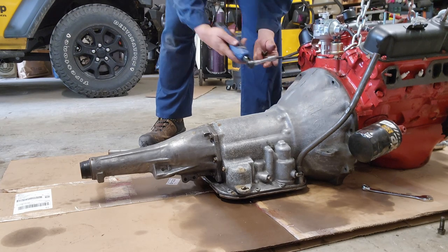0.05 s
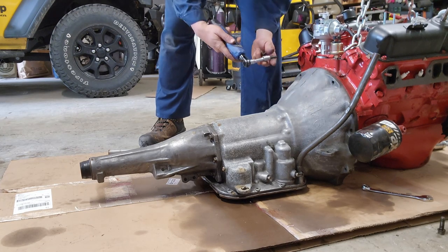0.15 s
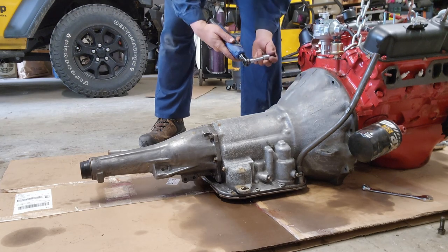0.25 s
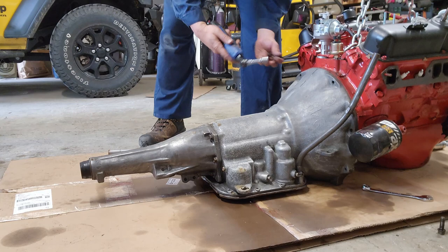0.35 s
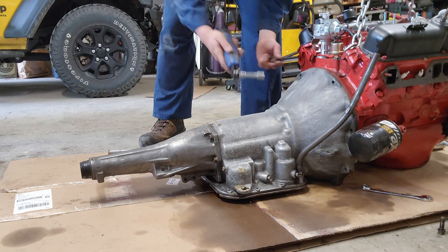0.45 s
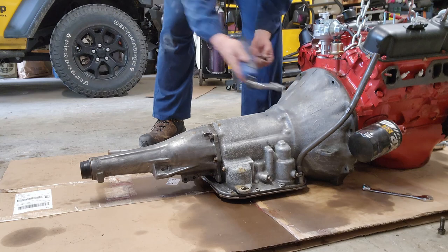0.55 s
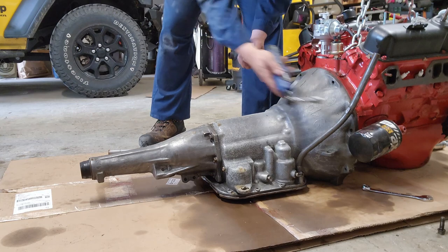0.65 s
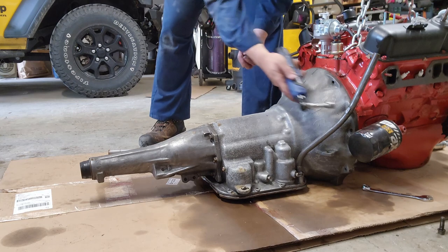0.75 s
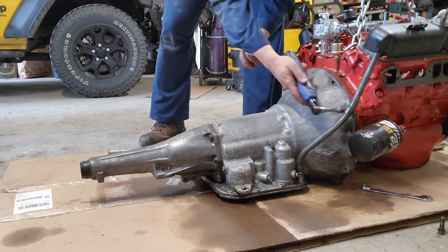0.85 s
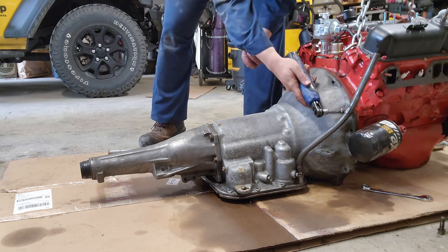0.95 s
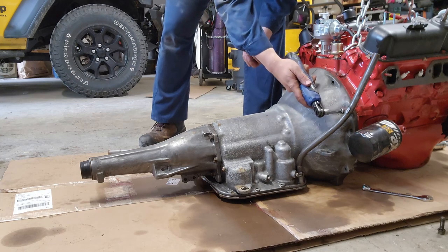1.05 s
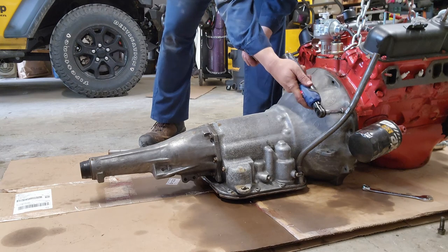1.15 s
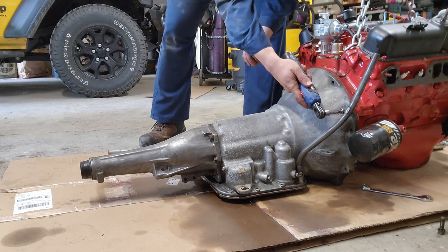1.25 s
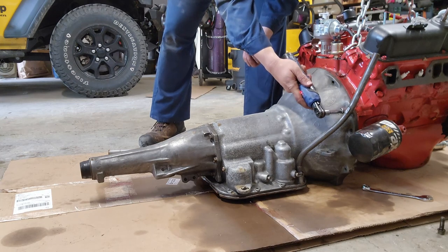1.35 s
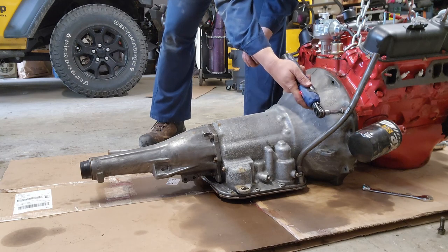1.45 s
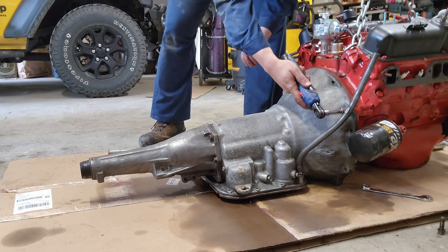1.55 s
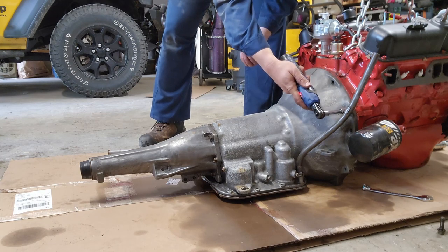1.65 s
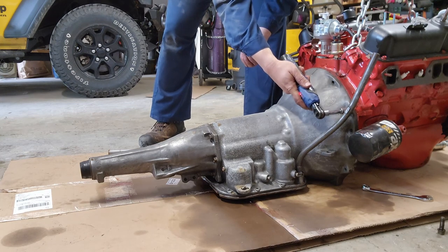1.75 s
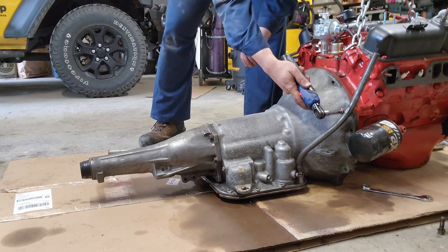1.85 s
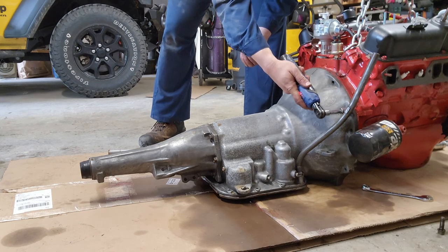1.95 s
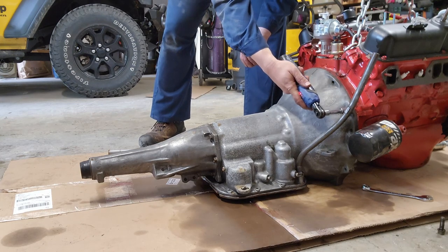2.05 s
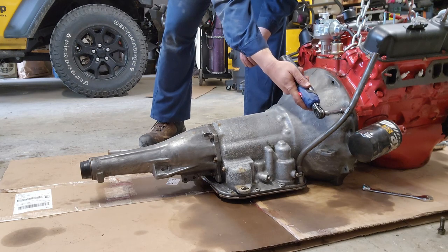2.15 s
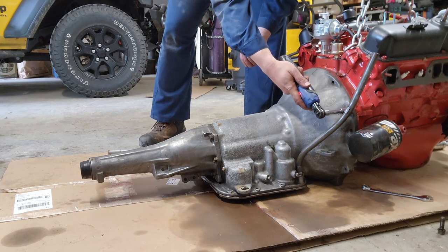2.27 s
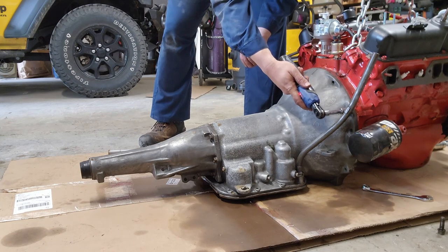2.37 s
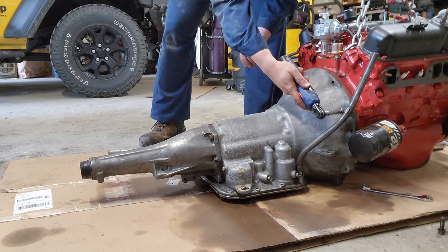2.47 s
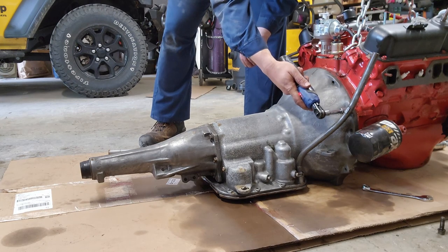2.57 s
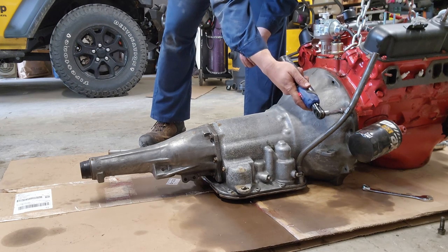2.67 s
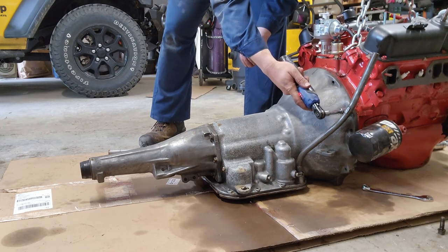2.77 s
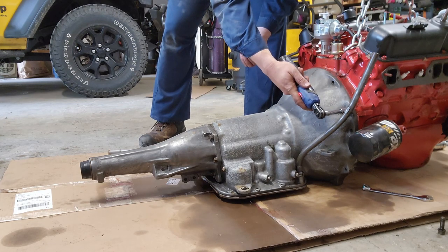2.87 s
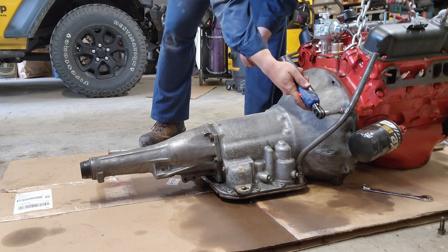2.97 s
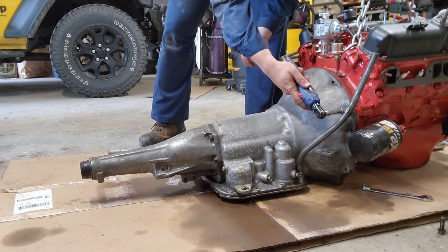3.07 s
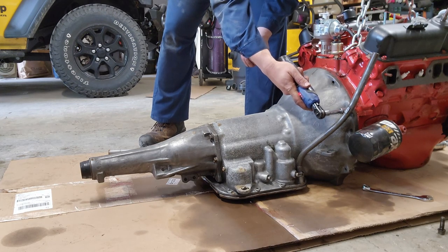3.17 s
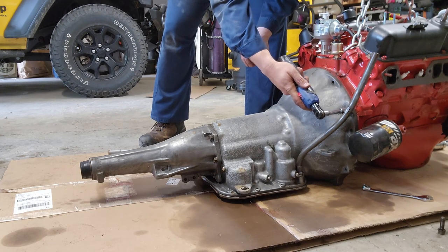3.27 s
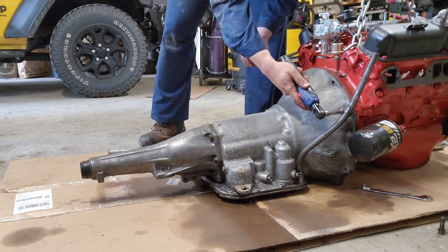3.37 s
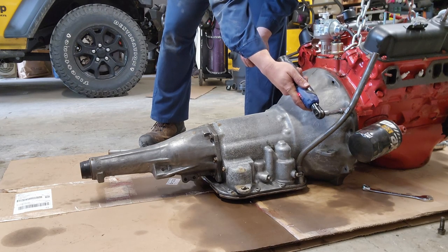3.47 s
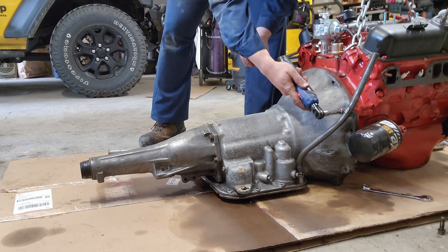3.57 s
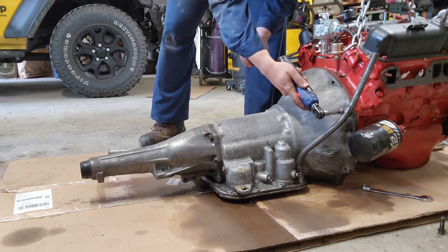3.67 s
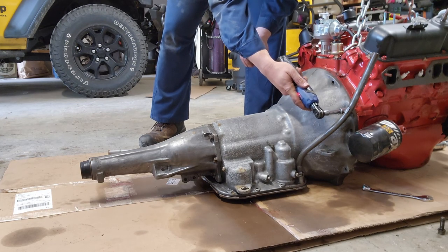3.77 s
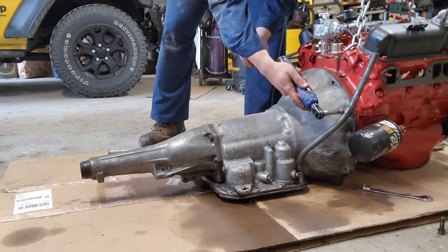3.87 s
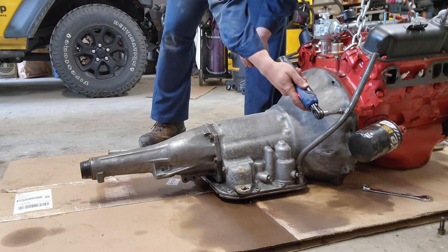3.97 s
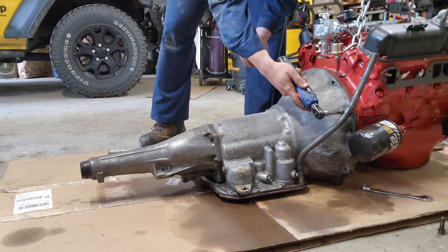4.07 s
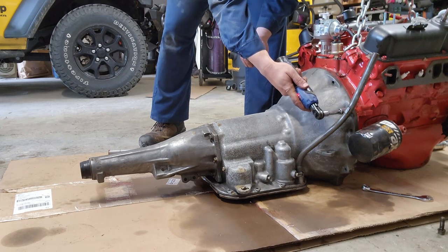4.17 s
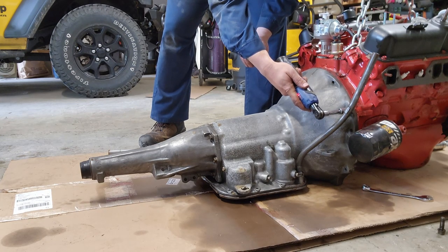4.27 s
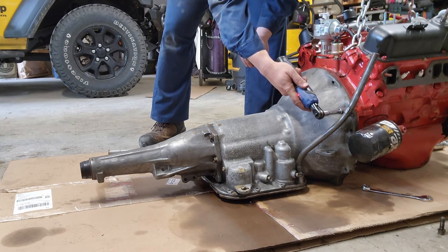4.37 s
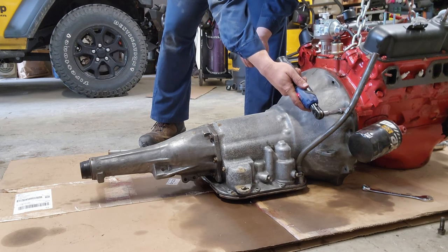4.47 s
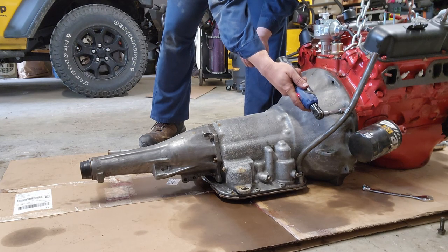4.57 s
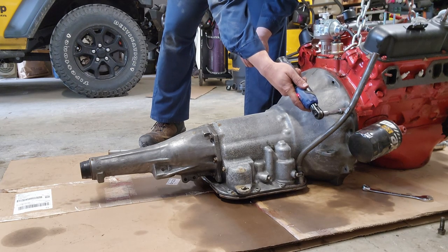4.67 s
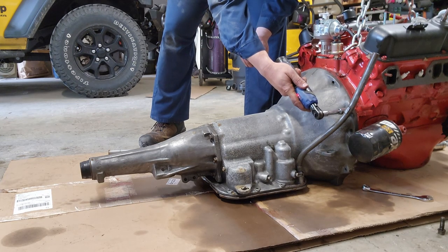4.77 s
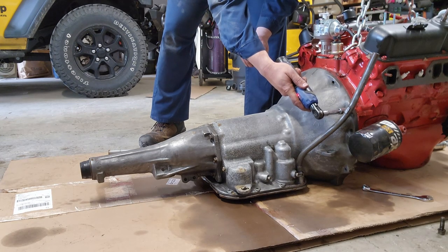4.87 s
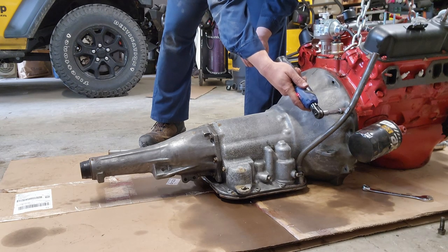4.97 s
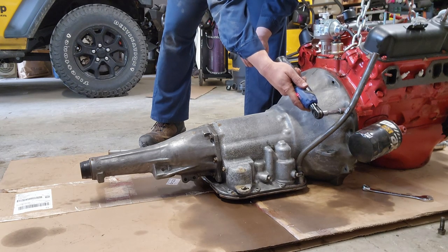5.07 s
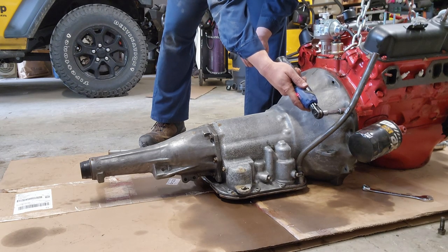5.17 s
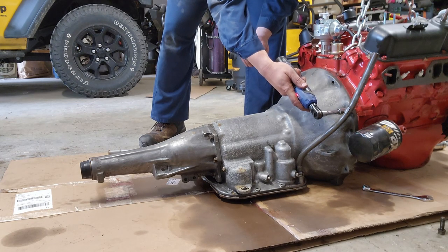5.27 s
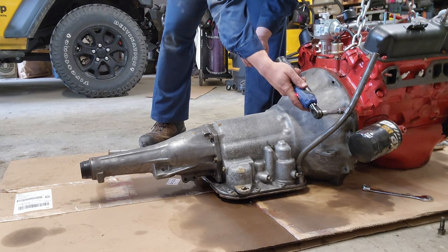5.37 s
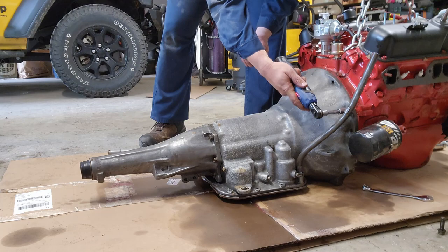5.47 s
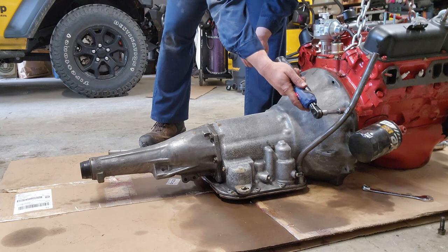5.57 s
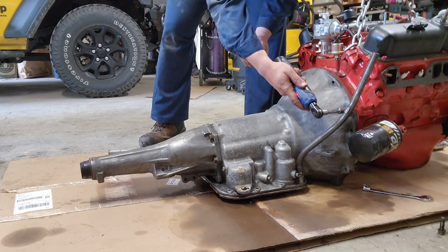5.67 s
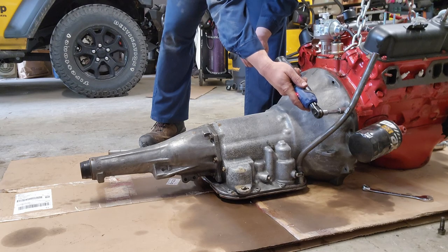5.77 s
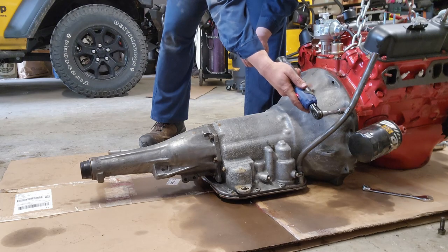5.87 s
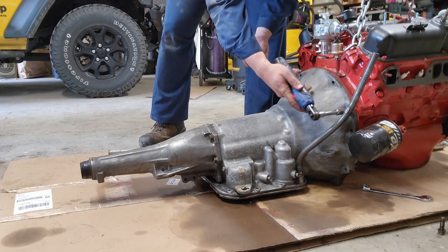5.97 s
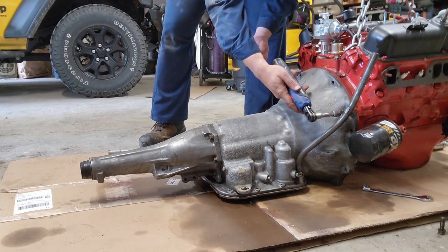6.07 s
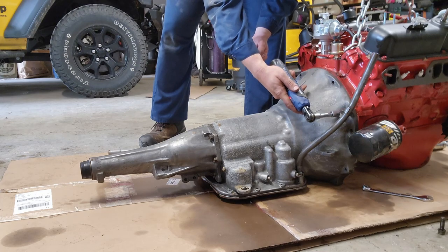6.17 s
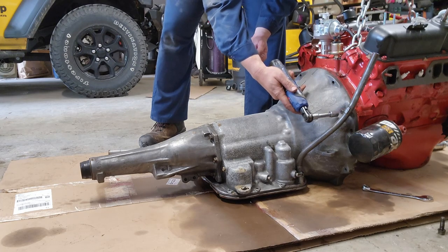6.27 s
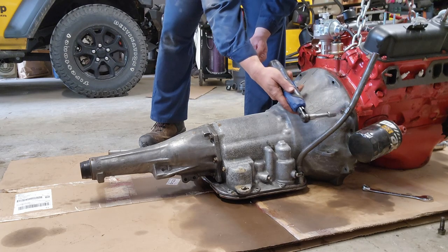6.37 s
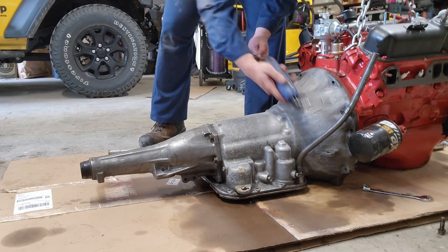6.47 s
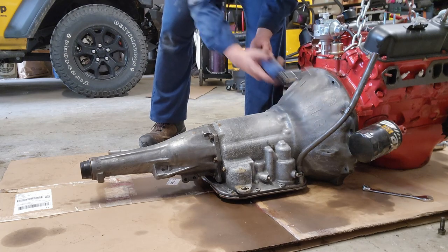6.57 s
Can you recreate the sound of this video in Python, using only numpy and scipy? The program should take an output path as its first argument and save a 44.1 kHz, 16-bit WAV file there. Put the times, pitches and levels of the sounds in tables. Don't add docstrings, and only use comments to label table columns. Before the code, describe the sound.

Quiet garage air with a few light metal touches and tiny distant insect chirps. A hard clank of socket on casting comes near one second, then the power ratchet starts: a fast, bright, grating clatter over a buzzing hum, held about four and a half seconds with irregular sharper snaps. Released, it slows into distinct ticks. Close stereo microphones, lively room tail.

```python
import sys
import numpy as np
from scipy import signal
from scipy.io import wavfile
from scipy.ndimage import uniform_filter1d

SR = 44100
rng = np.random.default_rng(int(sys.argv[2]) if len(sys.argv) > 2 else 0)


def persist_wave(psi):
    counts = np.round(np.clip(psi, -1, 1) * 32767).astype(np.int16)
    wavfile.write(sys.argv[1], SR, np.atleast_2d(counts).T)


def volts_from_decibels(level):
    exponent = np.asarray(level, float) / 20
    return 10 ** exponent


N = 291942
T = np.arange(N) / SR

# (frequency [Hz], likeness [0-1])
FACING = [(200, 0.69), (1000, 0.98), (3000, 0.35), (12000, 0.44)]

TRIGGER_S, FIRST_TURN_S, RUN_PER_S, SPIN_UP_LAG_S, SPIN_UP_S = 1.2272, 1.262, 64.88, .0218, .098
RELEASE_S, DRAG_S, FRICTION_PER_S = 5.7927, 1.378, 68.8
LAST_DRIVEN, WHEEL_TURNS = 302, 38.5
POWERED_S = np.clip(T, TRIGGER_S, RELEASE_S) - FIRST_TURN_S
COASTING_S = np.maximum(T - RELEASE_S, 0)
SPUN_UP = RUN_PER_S * (POWERED_S - SPIN_UP_LAG_S * (1 - np.exp(-POWERED_S / SPIN_UP_S)))
DRAGGED = (RUN_PER_S + FRICTION_PER_S) * DRAG_S * (1 - np.exp(-COASTING_S / DRAG_S))
TURNS = 1 + SPUN_UP + DRAGGED - FRICTION_PER_S * COASTING_S
SPEED = np.maximum(np.gradient(TURNS) * SR / RUN_PER_S, 0)


def evened(x):
    return x / np.sqrt(np.mean(x ** 2) + 1e-20)


def read(points, hz):
    f, value = np.transpose(points)
    return np.interp(np.log(hz + 1), np.log(f + 1), value)


def highpass(x, order, hz):
    return signal.sosfilt(signal.butter(order, hz, "high", fs=SR, output="sos"), x)


def alike(a, b, same):
    return np.array([a, same * a + np.sqrt(1 - same ** 2) * b])


def contact(train, seconds):
    return signal.lfilter([1], [1, -np.exp(-1 / (seconds * SR))], train)


def strike(force, modes):
    out, power = np.zeros((2, len(force))), 0
    grit = rng.standard_normal(2 * len(force))
    for hz, db, t60_s in modes:
        r = 10 ** (-3 / (t60_s * SR))
        turn = 2 * np.pi * hz / SR
        a, b = np.roll(grit, rng.integers(len(grit))).reshape(2, -1)
        rough = force * alike(a, b, np.clip(read(FACING, hz), 0, 1))
        ring = signal.lfilter([1], [1, -2 * r * np.cos(turn), r * r], rough)
        out += volts_from_decibels(db) * np.sin(turn) * ring
        power += volts_from_decibels(db) ** 2 / (2 - 2 * r * r)
    return out / np.sqrt(power)


def clicks(per_s, uneven_db):
    size = volts_from_decibels(uneven_db * np.minimum(rng.exponential(1, N), 5))
    return size * (rng.random(N) < per_s / SR)


def diffuse(frames, size, likeness=None):
    # (frequency [Hz], likeness [-1 to 1])
    room_likeness = [(60, 0.97), (240, 1), (950, 0.095), (3770, 0), (15000, -0.0)]
    hz = np.fft.rfftfreq(size, 1 / SR)
    a, b, c, d = rng.standard_normal((frames, len(hz), 4)).T
    same = np.clip(read(likeness or room_likeness, hz), -1, 1)[:, None]
    return hz[:, None], alike(a + 1j * b, c + 1j * d, same)


def drift(shape, bins, frames):
    return evened(uniform_filter1d(uniform_filter1d(rng.standard_normal(shape), bins, 0), frames, 1))


def per_turn(at, jitter_s, uneven_db, bounce_s):
    when_s = np.interp(np.arange(1, LAST_DRIVEN + 1) + at, TURNS, T)
    late, force, gap, again = rng.standard_normal((len(when_s), 4)).T
    when_s = when_s + jitter_s * late
    bounced_s = when_s + bounce_s * (1 + .4 * abs(gap))
    size = volts_from_decibels(uneven_db * force)
    train = np.zeros(N)
    np.add.at(train, (when_s * SR).astype(int), size)
    np.add.at(train, (bounced_s * SR).astype(int), size * volts_from_decibels(-7 + 4 * again))
    return train


def step(s, rise_s):
    return .5 + .5 * np.tanh((T - s) / rise_s)


def load(db, swing, last=LAST_DRIVEN):
    swing_db = sum(depth_db * np.cos(2 * np.pi * (k * TURNS / WHEEL_TURNS - lag)) for k, depth_db, lag in swing)
    take_up_db = -2.5 * np.exp(-abs(T - TRIGGER_S) / 0.18)
    return volts_from_decibels(db + swing_db + take_up_db) * (T > TRIGGER_S + .02) * (TURNS < last + 1)


def earlier(db):
    return volts_from_decibels(db - 255 * T)


def hall():
    # (frequency [Hz], density [dB per Hz])
    hall_colour = [(59, -41), (100, -13), (129, -10.5), (153, -24), (219, -16), (461, -13), (595, -5.5),
                   (662, -10), (836, -20.5), (2040, -13.5), (2900, -31), (3700, -24.5), (4770, -17.5),
                   (10200, -37), (16000, -59)]
    # (frequency [Hz], density [dB per Hz])
    draught_colour = [(8.8, -38), (15, -17), (65, 9), (79, 10), (97, -22), (110, -18), (140, -52),
                      (240, -120)]
    # (time [s], level [dB])
    gust_levels = [(0.0, -79), (0.35, -73.5), (2.57, -75), (2.66, -70), (2.9, -93), (2.96, -80),
                   (3.42, -84), (3.47, -65), (3.82, -98), (3.93, -74), (5.09, -74.5), (5.13, -99),
                   (5.18, -76), (5.39, -72), (5.44, -84), (5.99, -71), (6.21, -79), (6.6, -81)]
    hall_db, draught_db = -66.5, 1
    frames = N // 512 + 5
    hz, z = diffuse(frames, size=2048)
    patches = drift(z.shape[1:], 14, 7)
    lumps = evened(uniform_filter1d(rng.standard_normal(frames), 7))
    gusts = diffuse(frames, size=2048, likeness=[(20, 0.65), (100, 0.94)])[1]

    def sounded(spectra):
        return evened(signal.istft(spectra, nperseg=2048, noverlap=1536)[1][:, :N])

    air = sounded(z * volts_from_decibels(read(hall_colour, hz) + 1.5 * patches))
    low = sounded(gusts * volts_from_decibels(read(draught_colour, hz) + 5 * lumps))
    gust_db = np.interp(T, *np.transpose(gust_levels)) + np.array([[1.1], [-1.1]])
    return volts_from_decibels(hall_db) * air + volts_from_decibels(draught_db + gust_db) * low


def insects():
    # (time [s], frequency [Hz], level [dB], length [s])
    chirps = [
        (0.344, 4780, -62, 0.017),
        (0.382, 5000, -58, 0.031),
        (0.43, 3650, -72, 0.045),
        (0.76, 3700, -70, 0.064),
        (.846, 4700, -66, 0.018),
        (0.882, 4960, -57, 0.026),
    ]
    out = np.zeros(N)
    for s, hz, db, length_s in chirps:
        t = np.arange(round(length_s * SR)) / SR
        throb = 1 + 0.83 * np.cos(2 * np.pi * 70 * t)
        whistle = volts_from_decibels(db) * np.sin(2 * np.pi * hz * t) * throb
        out[round(s * SR):][:len(t)] += whistle * signal.windows.tukey(len(t), .5)
    return out


def garage(x):
    # (frequency [Hz], t60 [s])
    decay = [(200, 0.087), (1000, 0.71), (3500, 0.43), (8000, 0.31), (15000, 0.2)]
    out = 0
    for k in range(3):
        hz, z = diffuse(500, size=256)
        t = np.arange(500) * 64 / SR
        fade = volts_from_decibels(-60 * t / read(decay, hz)) * np.clip(t / 0.0065, 0, 1)
        tail = signal.istft(z * fade, nperseg=256, noverlap=192)[1]
        tail = tail / np.linalg.norm(tail[0])
        turn = np.sqrt(2 / 3) * np.cos(2 * np.pi * (1.3 * T + k / 3))
        out = out + signal.fftconvolve((x * turn)[None], tail, axes=1)[:, :N]
    return out


def socket():
    # (time [s], peak level [dB], centre [Hz], width [octaves], contact [s])
    clanks = [(.02, -47, 950, 0.34, 0.034), (.035, -52, 9500, 0.96, .004), (0.196, -34, 9400, 0.32, 0.0041),
              (.262, -54, 11000, .6, .003), (.377, -54, 8500, .45, .003), (0.398, -49.5, 850, 1.5, 0.0052),
              (.971, -17, 3970, 1.34, 0.011), (.972, -29, 1560, .2, .008), (.991, -26, 2420, 0.72, 0.007),
              (1.021, -43, 3600, .8, 0.0025), (1.158, -32.5, 7000, 0.58, 0.0071),
              (1.213, -36, 1300, 1.3, 0.028), (1.2272, -35.5, 7450, .25, .006),
              (1.245, -21, 1320, 0.89, 0.09)]
    # (frequency [Hz], level [dB], t60 [s])
    casting = [(850, 1.5, 0.0097), (1000, -1, 0.0055), (1560, 2, 0.0073), (2280, 8, 0.002),
               (3100, -2, 0.0097), (3400, 9, 0.011), (3770, 7, 0.0072), (4340, 5, 0.0051),
               (5000, 5, 0.0086), (5750, 6.5, 0.0046), (6740, 9, 0.0026), (7470, 1, 0.004),
               (9000, 11, 0.0027), (11000, 8, 0.002), (13200, 14, 0.0022), (14500, 9, 0.002)]
    # (time [s], peak level [dB], frequency [Hz])
    jolts = [(.985, -65, 235), (1.164, -56, 229), (1.2, -59, 230), (1.245, -43, 222), (3.748, -59, 342),
             (4.341, -47, 217), (4.934, -57, 194), (5.247, -45, 310), (5.595, -67, 190), (1.41, -40, 122),
             (1.86, -43.5, 123), (5.621, -40.5, 130), (5.719, -46, 126), (5.85, -50, 125)]
    first_knock, last_snap, knock_at = 312, 319, .42
    out = np.zeros((2, N))
    knocks = []
    for s in np.interp(np.arange(first_knock, last_snap + 1) + knock_at, TURNS, T):
        knock_db = -27.5 + 20 * 0.4 * np.log10(np.interp(s, T, SPEED))
        knocks.append((s, knock_db, 1300, 1, 0.0094))
    for s, db, centre_hz, octaves, contact_s in [*clanks, *knocks]:
        modes = [(hz, level_db - 6 * (np.log2(hz / centre_hz) / octaves) ** 2, t60_s)
                 for hz, level_db, t60_s in casting]
        blow = strike(contact(signal.unit_impulse(3000), contact_s), modes)
        part = out[:, round(s * SR):][:, :3000]
        part += (volts_from_decibels(db) * blow / abs(blow).max())[:, :part.shape[1]]
    out = highpass(out, 4, 680)
    t = np.arange(16000) / SR
    for s, db, hz in jolts:
        thud = volts_from_decibels(db - 60 * t / 0.32) * np.sin(2 * np.pi * hz * t)
        out[:, round(s * SR):][:, :16000] += thud * np.clip(t / 0.0067, 0, 1)
    return out


def crank():
    # (multiple of crank rate, level [dB])
    orders = [(2, -10.5), (3, -4), (4, -19), (5, -6.5), (6, -6.5), (7, -5), (8, 3), (9, -13), (10, 4.5),
              (11, 8), (12, 0.5), (13, 4), (14, 2.5), (15, -1), (16, 0.5), (17, -0.5), (18, -23), (20, -2),
              (21, 3.5), (23, 1), (28, -8), (29, -2), (32, 2.5), (36, 1)]
    # (time [s], hum level [dB])
    effort = [(1.3, -44), (2.68, -43), (2.84, -47), (2.9, -41), (3.46, -44.5), (3.49, -38.5), (3.66, -43.5),
              (3.9, -40), (3.99, -49), (4.03, -43.5), (4.53, -39), (4.56, -43.5), (4.97, -39),
              (5.06, -43.5), (5.61, -39.5), (6.06, -48.5)]
    # (multiple, swing [dB], lag [cycles])
    hum_swing = [(1, 0.58, -0.17), (2, 0.91, -0.39)]
    last_hum = 307
    angle = 2 * np.pi * TURNS
    waver = rng.standard_normal((220, len(orders), 2)) @ [.7, .7j] + 0.75
    start = rng.uniform(0, 2 * np.pi, len(orders))
    hum = np.zeros(N)
    for (k, db), w, phase in zip(orders, waver.T, start):
        wavering = np.interp(T, np.linspace(0, T[-1], len(w)), w)
        hum += volts_from_decibels(db) * (wavering * np.exp(1j * (k * angle + phase))).real
    effort_db = 0.5 + np.interp(T, *np.transpose(effort))
    level = uniform_filter1d(load(effort_db, hum_swing, last_hum), size=3000)
    return level * SPEED ** 0.82 * evened(hum)


def gears():
    # (frequency [Hz], density [dB per Hz])
    housing = [(59, -76), (100, -71), (189, -86), (295, -25), (420, -15), (595, -10), (705, -9),
               (1200, -7.5), (2000, -3.5), (2450, -3.5), (2720, -7.5), (3000, -5), (4290, -3), (5900, -7.5),
               (9820, -2), (11900, -3.5), (16000, -4.5)]
    hz, t, z = signal.stft(clicks(4000, 1.9) * rng.standard_normal((2, N)), SR, nperseg=1024)
    z = alike(z[0], z[1], np.clip(read(FACING, hz), 0, 1)[:, None])
    hz = hz[:, None]
    patches = drift(z.shape[1:], 12, 6)
    slowed = np.interp(t, T, (1 - SPEED) * (COASTING_S > 0))
    dull_db = -4 * np.log2(1 + hz / 2500) * slowed
    thin_db = -25 * slowed / (1 + (hz / 380) ** 4)
    colour_db = read(housing, hz) + dull_db + thin_db + 1.18 * patches
    rattle = evened(signal.istft(z * volts_from_decibels(colour_db), SR, nperseg=1024)[1][:, :N])
    start_db = -5 * np.exp(-abs(T - TRIGGER_S) / 0.028)
    running = volts_from_decibels(-23 + start_db) * SPEED ** 1.38
    return rattle * (running + earlier(-41.5))


def yoke():
    # (frequency [Hz], level [dB], t60 [s])
    yoke_modes = [(4370, -10, 0.0078), (5495, -9.5, 0.009), (6453, -7.5, 0.012), (7000, -11, 0.011),
                  (7550, 2, 0.0017)]
    # (multiple, swing [dB], lag [cycles])
    yoke_swing = [(1, 2, 0.34), (2, 0.24, 0.46)]
    knocks = evened(contact(per_turn(.3, 0.0004, 1.9, 0.0012), 0.00049))
    return strike(knocks * load(-36, yoke_swing), yoke_modes)


def pawl():
    # (frequency [Hz], level [dB], t60 [s])
    head = [(11420, -2, .007), (11700, 0, .008), (12020, -2, .007), (10600, -9, .003), (11100, -5, .004),
            (12500, -5, .004), (13100, -7, .003), (13800, -6, .0025), (14600, -7, .0025), (15500, -5, .004),
            (9300, -17, .002), (7300, -18, .003), (4400, -20, .003)]
    # (time [s], peak level [dB])
    hard_snaps = [(1.2997, -15), (1.527, -17), (1.542, -10), (1.59, -17), (1.6212, -4), (1.7289, -10),
                  (1.7425, -6), (1.7748, -6.5), (1.868, -11), (2.1765, -10), (2.2078, -5), (2.2407, -5),
                  (2.2836, -20), (2.3153, -13), (2.3305, -7), (2.3766, -10), (2.561, -23), (2.6124, -13.5),
                  (2.6692, -16), (2.7455, -11), (2.763, -7), (2.7928, -5), (2.8093, -3), (2.825, -3),
                  (2.8866, -11), (2.9002, -11), (3.038, -14), (3.0698, -6), (3.2554, -24), (3.286, -10),
                  (3.332, -12), (3.3951, -14), (3.485, -22), (3.533, -11), (3.8725, -28), (3.9348, -6),
                  (3.965, -12), (4.057, -9), (4.1183, -8), (4.2107, -24), (4.271, -13), (4.4743, -8),
                  (4.551, -7), (4.6577, -13), (4.704, -6), (4.859, -19), (4.8728, -15), (5.0283, -24),
                  (5.091, -20), (5.3192, -23), (5.3973, -21), (5.5207, -8), (5.644, -8), (5.737, -13),
                  (5.8136, -21), (5.845, -12), (5.9006, -23), (5.9375, -14), (5.9606, -26)]
    # (time [s], peak level [dB], rebound [dB])
    coast_snaps = [(5.9575, -17, -1), (5.981, -20, -7), (6.001, -18, -3), (6.023, -25, -1),
                   (6.0444, -19.5, -5), (6.069, -22, 3), (6.0935, -19.5, -1), (6.119, -20.5, -9),
                   (6.1482, -17.5, -7), (6.1786, -15.5, -7), (6.211, -27, -1), (6.247, -20, -5),
                   (6.2848, -22, 1), (6.3297, -21.5, -2), (6.3773, -23, -10), (6.436, -22.5, -6),
                   (6.5141, -23, -11)]
    # (multiple, swing [dB], lag [cycles])
    pawl_swing = [(1, 4, -0.4), (3, 3.3, 0.3), (4, 3.3, 0.33)]
    # (multiple, swing [dB], lag [cycles])
    chatter_beat = [(1, 2, 0.069), (3, 1.5, -0.079)]
    rebound_s, settle_db, settle_s = 0.00426, -12, 0.0051

    single, first = np.zeros((2, N))
    for s, db, rebound_db in [(TRIGGER_S, -22.5, -4), *coast_snaps]:
        at = ((s + rebound_s * np.arange(3)) * SR).astype(int)
        single[at] = volts_from_decibels(db + np.array([0, rebound_db, rebound_db - 12]))
        first[at[0]] = volts_from_decibels(db)
    single = contact(contact(single, 0.00018) / 9.4, 0.0018) + volts_from_decibels(settle_db) * contact(first, settle_s)

    hard = np.zeros(N)
    for s, db in hard_snaps:
        hard[round(s * SR)] = volts_from_decibels(db)
    hard = volts_from_decibels(-20.5) * contact(contact(hard, 0.00048), 0.00066)

    main = per_turn(-0.039, 0.0003, 1.0, 0.00267)
    back = volts_from_decibels(-12.5) * per_turn(0.275, 0.00131, 9.0, 0.0016)
    back = back + volts_from_decibels(-47) * per_turn(0.44, 0.0012, 3.5, 0.00058)
    driven = evened(contact(contact(main + back, 0.00023), 0.00023)) * load(-32, pawl_swing)

    slack = volts_from_decibels(-37.5 + 1.14 * T + 6.5 * step(5.73, 0.13)) * step(1.25, 0.08)
    beat_db = sum(depth_db * np.cos(2 * np.pi * (k * TURNS - lag)) for k, depth_db, lag in chatter_beat)
    chatter = evened(contact(clicks(1500, 2.2), .0003))
    chatter = chatter * (slack * volts_from_decibels(beat_db) * SPEED ** 5.2 + earlier(-45))

    loaded = driven ** 2 + hard ** 2
    loose = chatter ** 2 + (volts_from_decibels(-2.0) * single) ** 2
    rings = strike(np.sqrt(loaded + loose), head[:3])
    rings = rings + volts_from_decibels(5.0) * strike(np.sqrt(0.038 * loaded + loose), head[3:])
    rings = highpass(rings, 2, 900)
    crack = highpass(single * rng.standard_normal((2, N)), 2, 4000)
    return rings + volts_from_decibels(-6) * crack


def scene():
    tool = pawl() + yoke() + gears() + crank() + socket()
    tool = .75 * np.tanh(tool / .75)
    tool = highpass(tool, 6, 165)
    lead = 7
    near = np.array([tool[0], np.roll(tool[1], lead)]) * volts_from_decibels([[-1.6], [-2.4]])
    far = insects()
    return near + volts_from_decibels(-5) * garage(tool[0] + 0.81 * far) + 0.5 * far + hall()


def top_cut(x):
    return signal.sosfilt(signal.butter(12, 15950, fs=SR, output="sos"), x)


def record(dry):
    edge = signal.firwin(1535, 15800, window=("kaiser", 9), fs=SR)
    return top_cut(signal.oaconvolve(dry, edge[None], "same"))


dry = scene()
out = record(dry)
persist_wave(out)
```